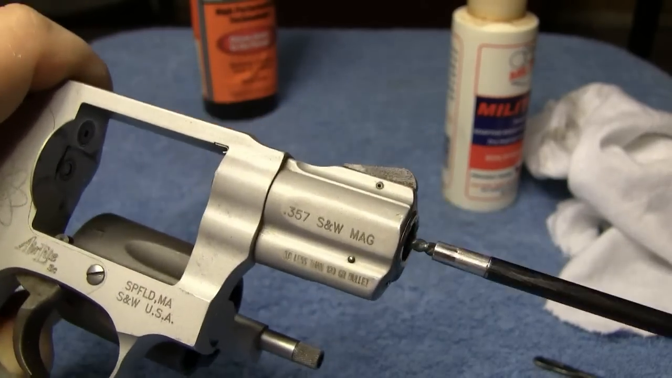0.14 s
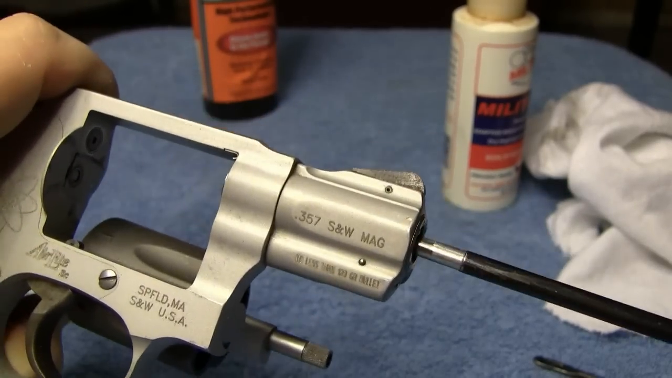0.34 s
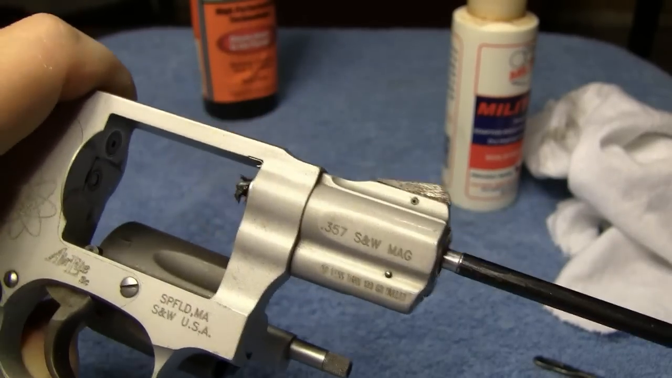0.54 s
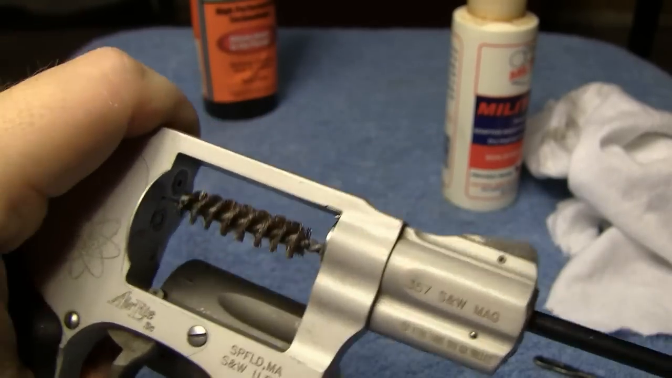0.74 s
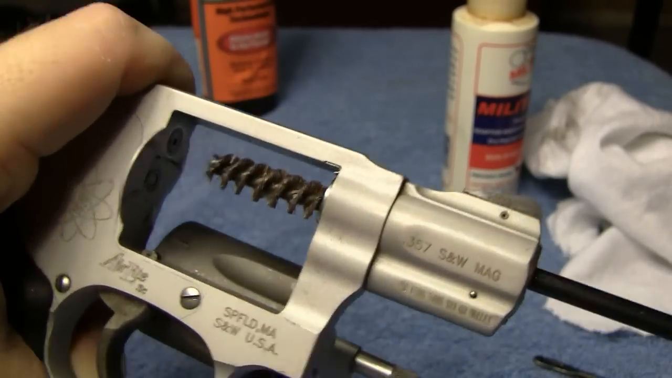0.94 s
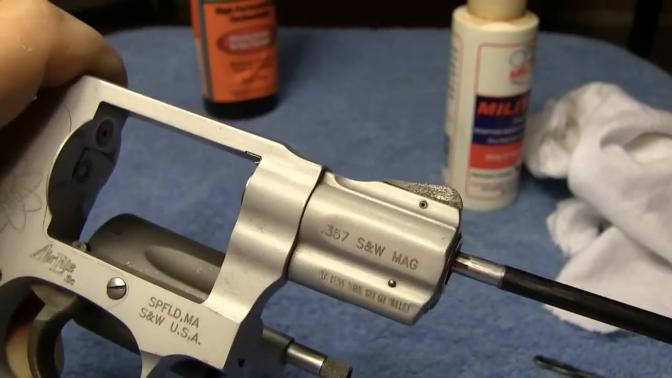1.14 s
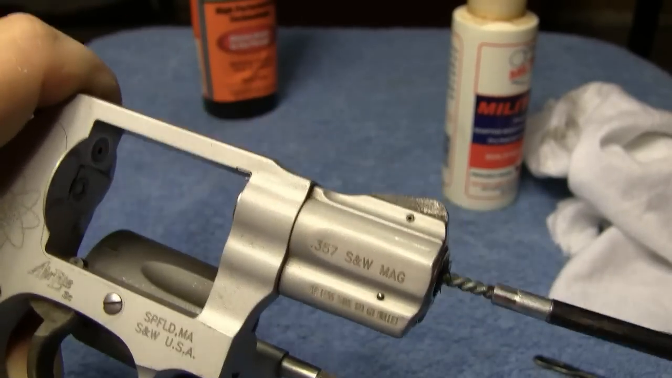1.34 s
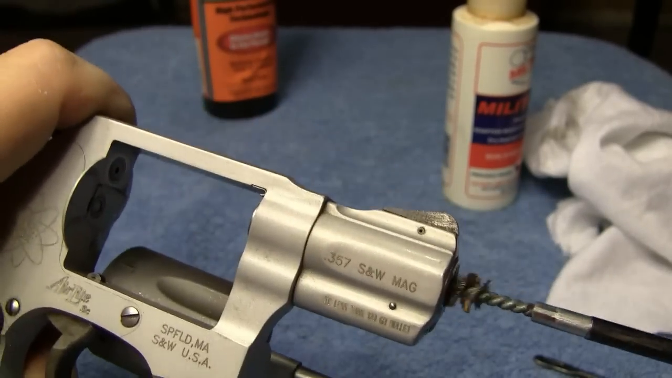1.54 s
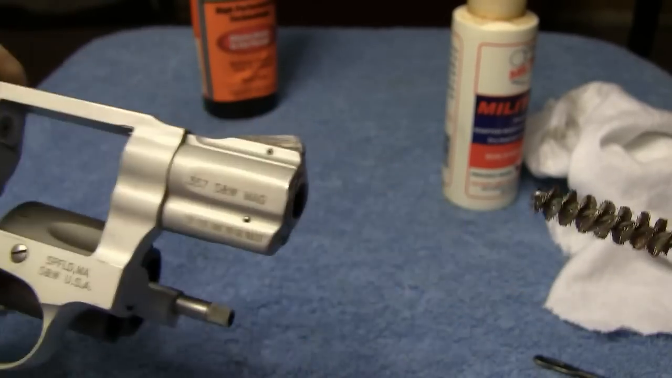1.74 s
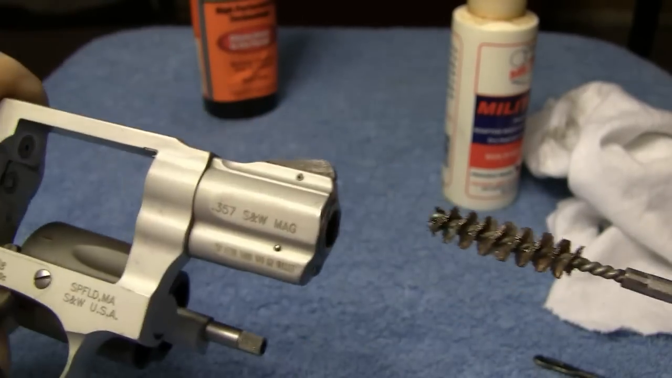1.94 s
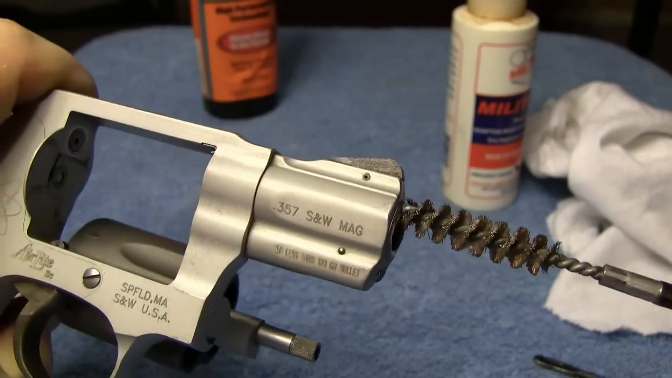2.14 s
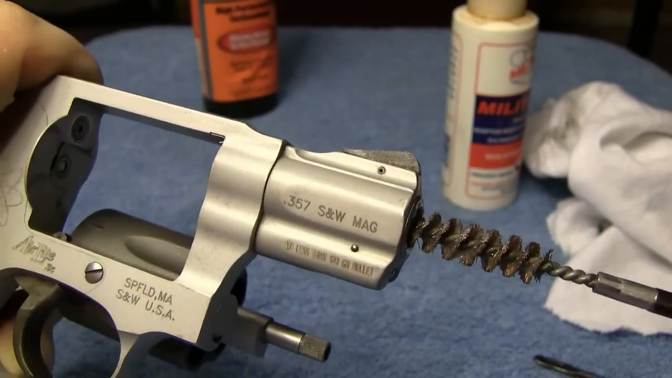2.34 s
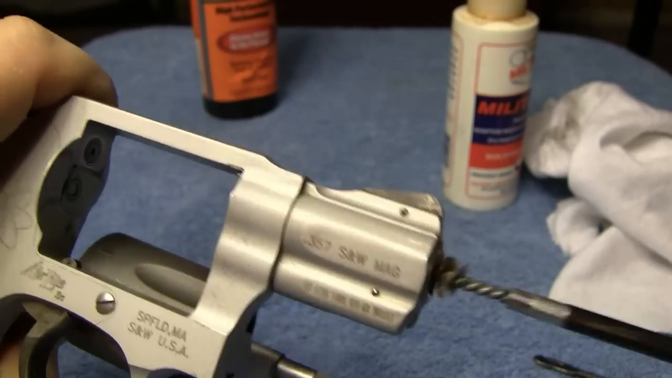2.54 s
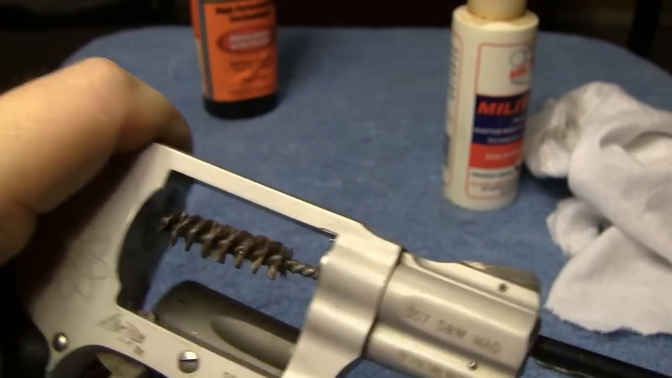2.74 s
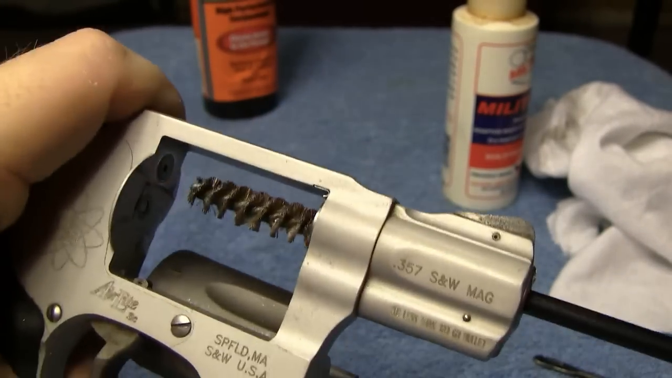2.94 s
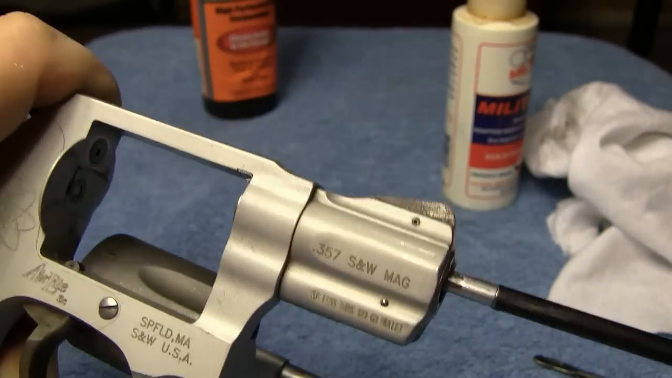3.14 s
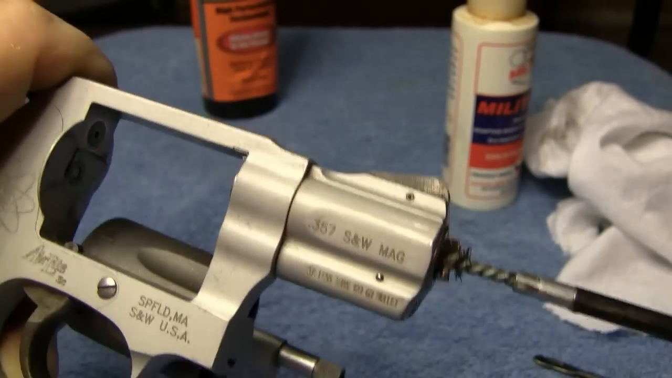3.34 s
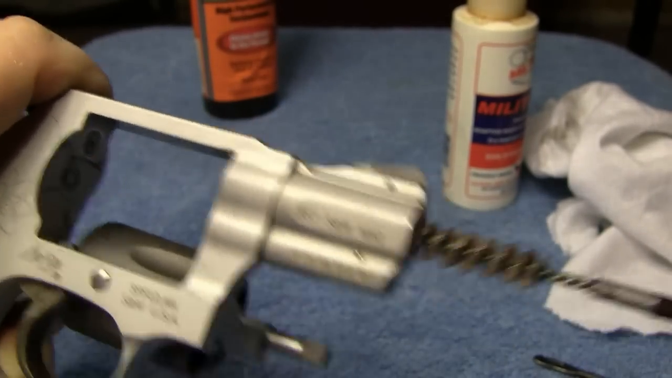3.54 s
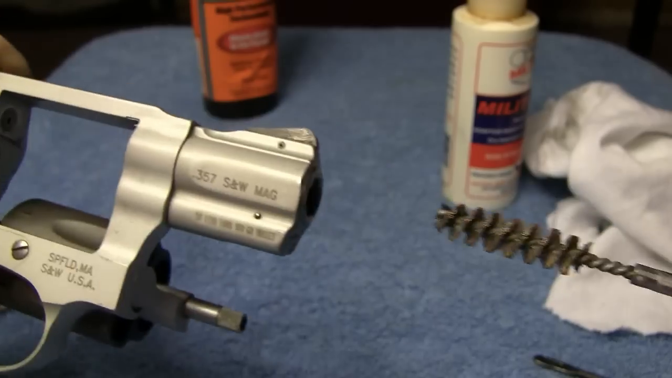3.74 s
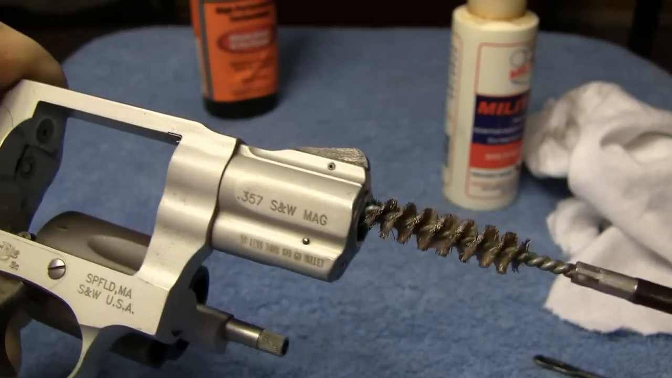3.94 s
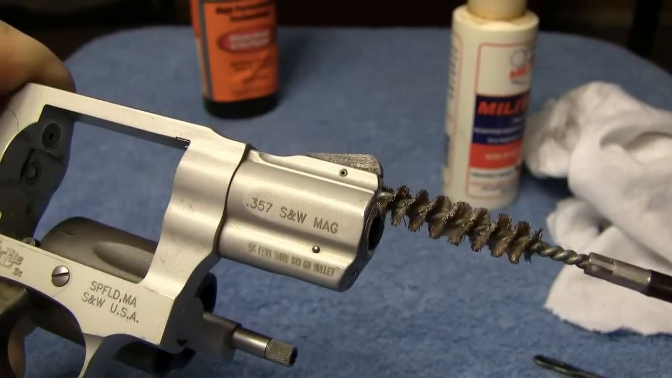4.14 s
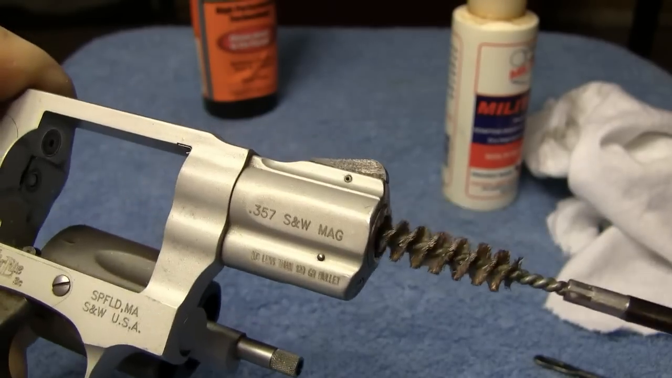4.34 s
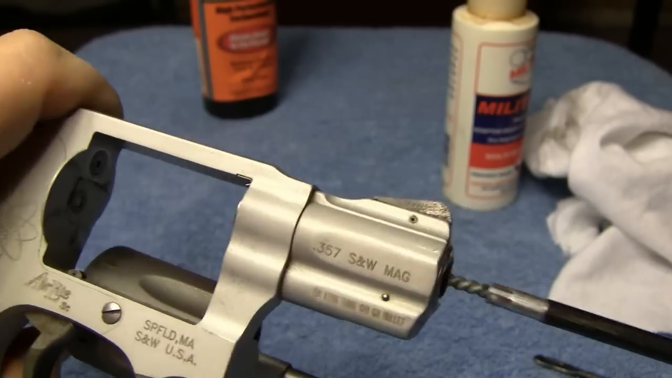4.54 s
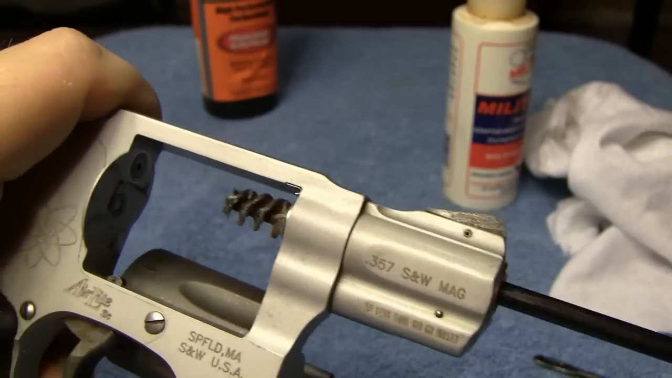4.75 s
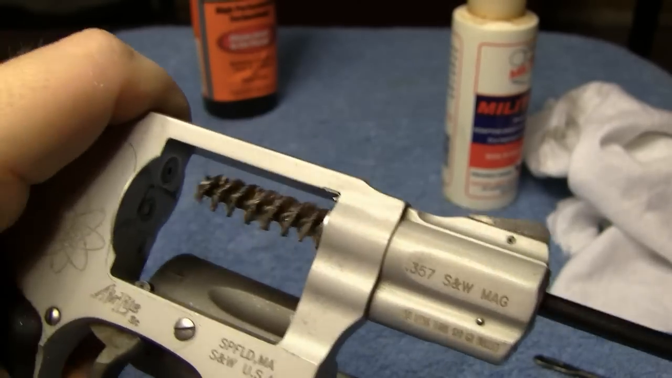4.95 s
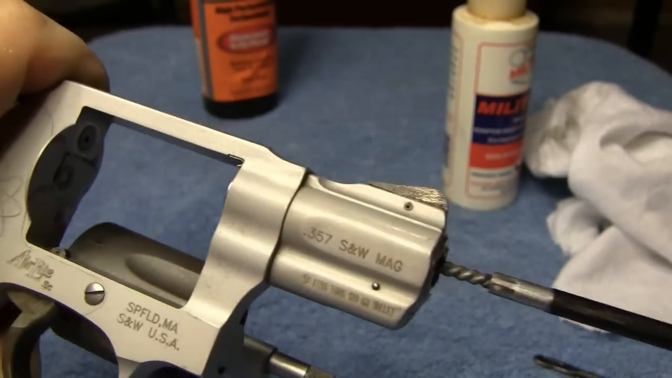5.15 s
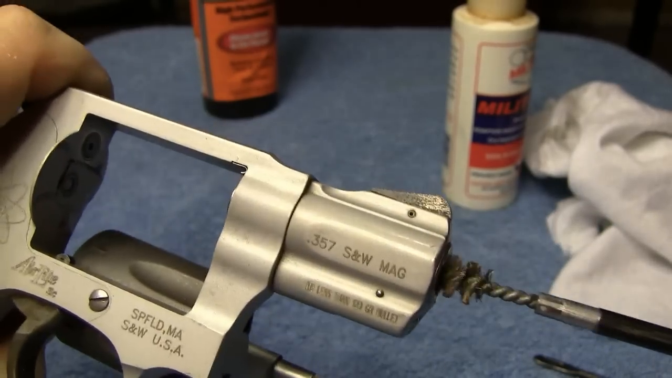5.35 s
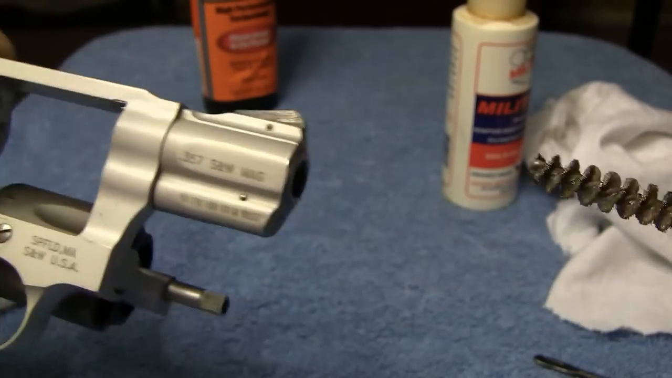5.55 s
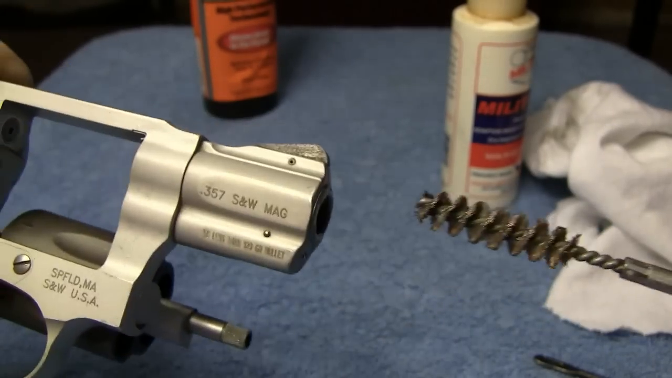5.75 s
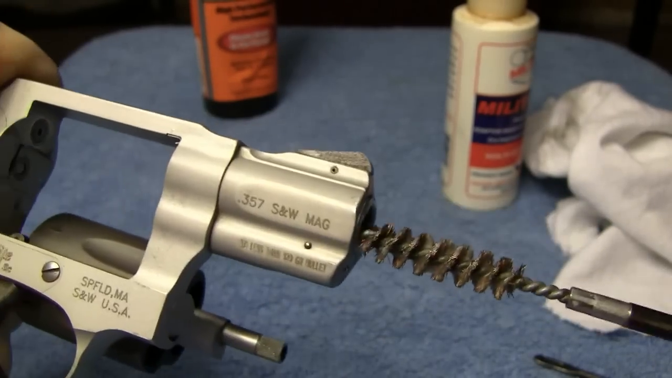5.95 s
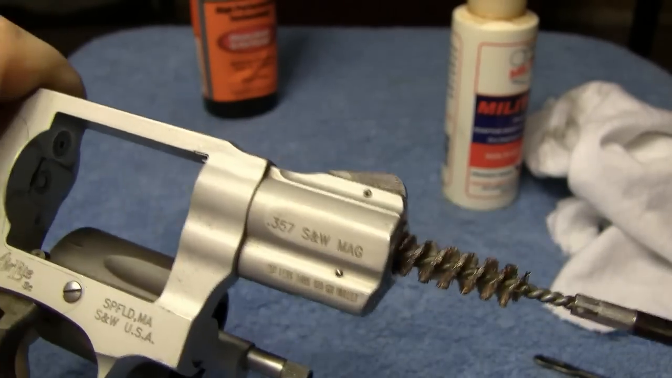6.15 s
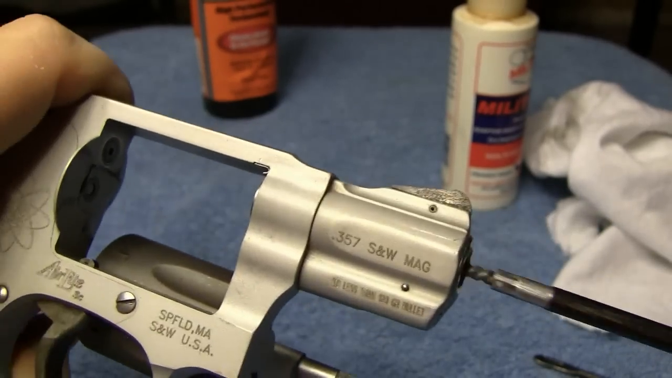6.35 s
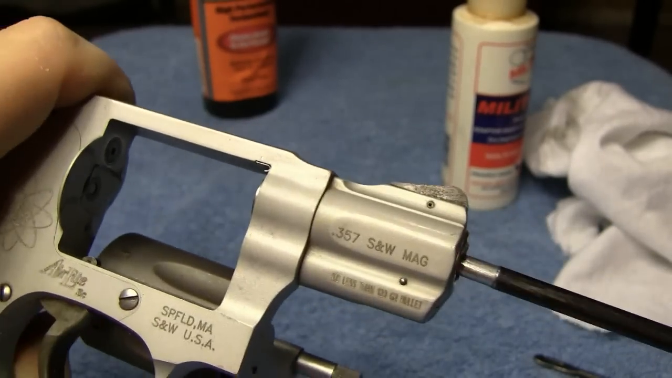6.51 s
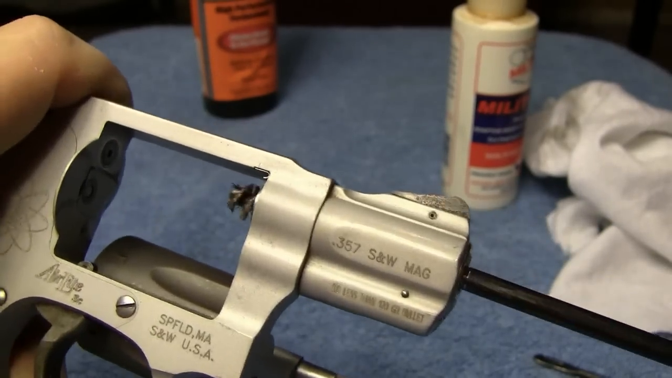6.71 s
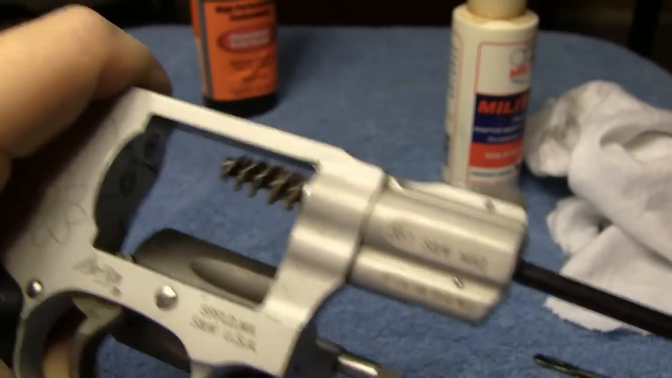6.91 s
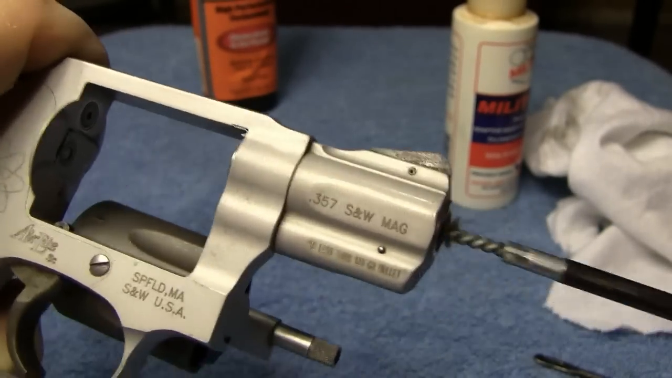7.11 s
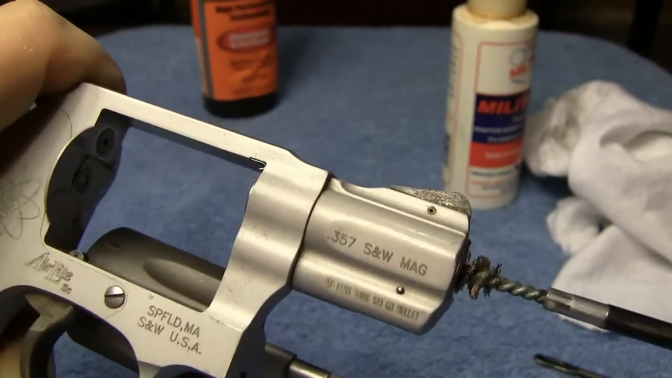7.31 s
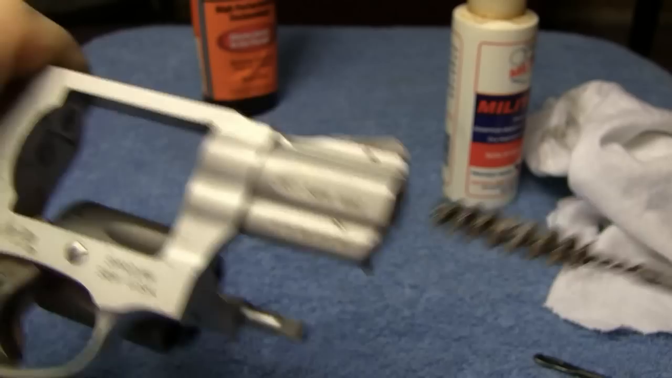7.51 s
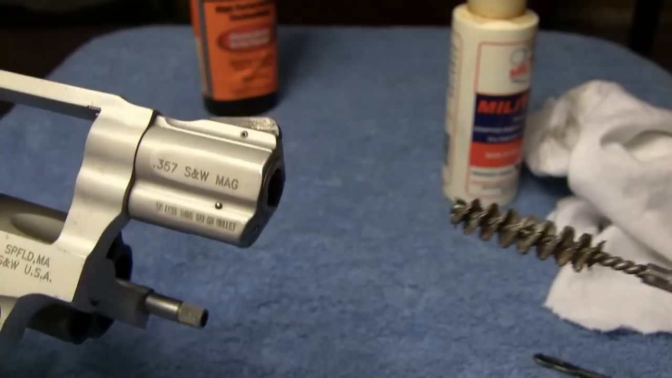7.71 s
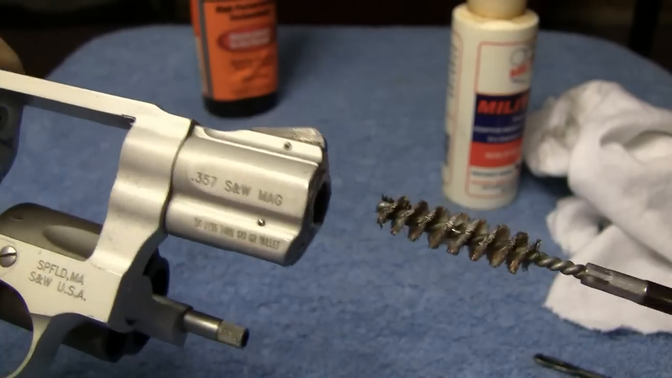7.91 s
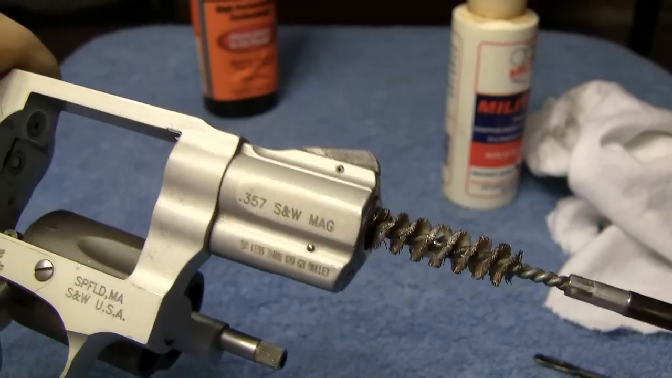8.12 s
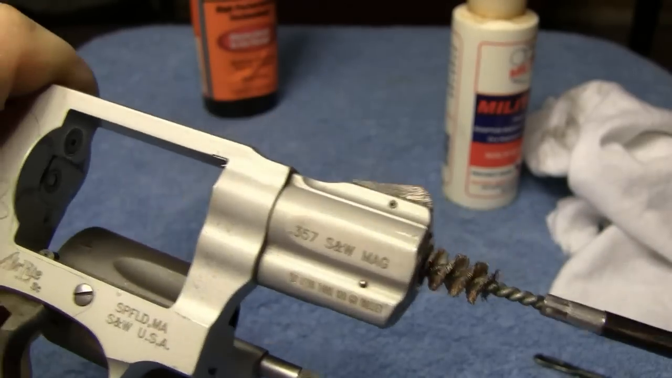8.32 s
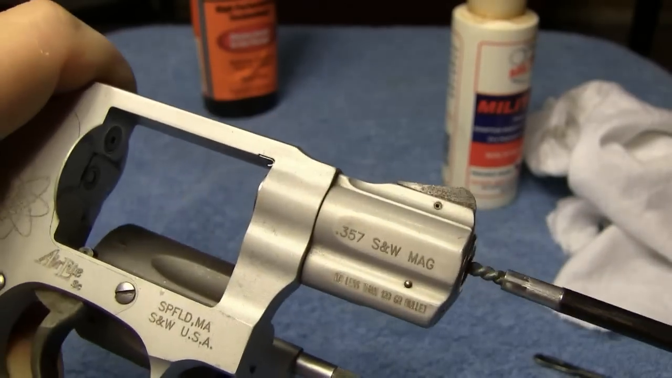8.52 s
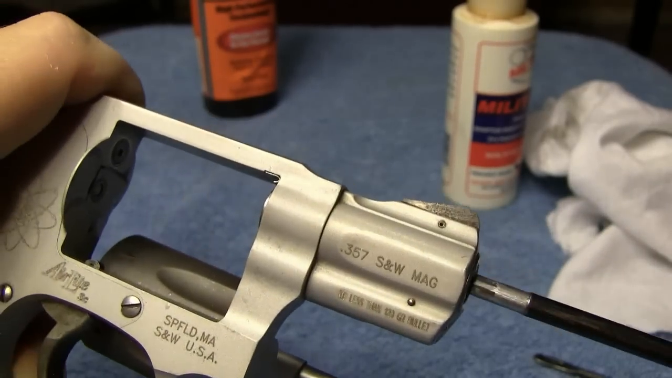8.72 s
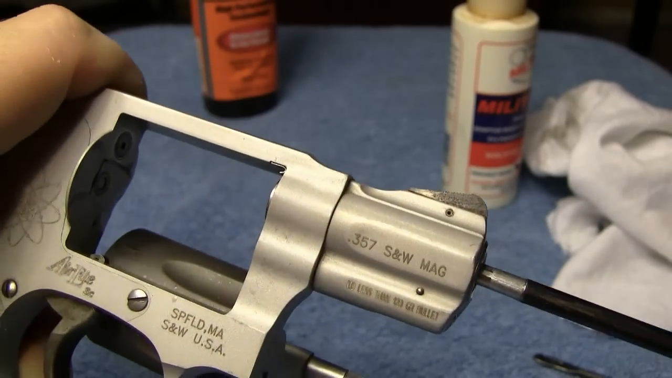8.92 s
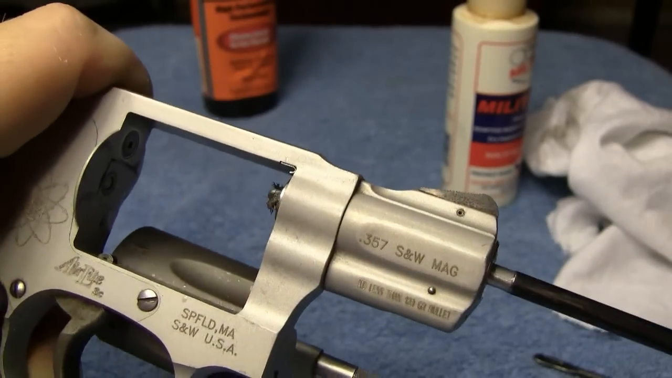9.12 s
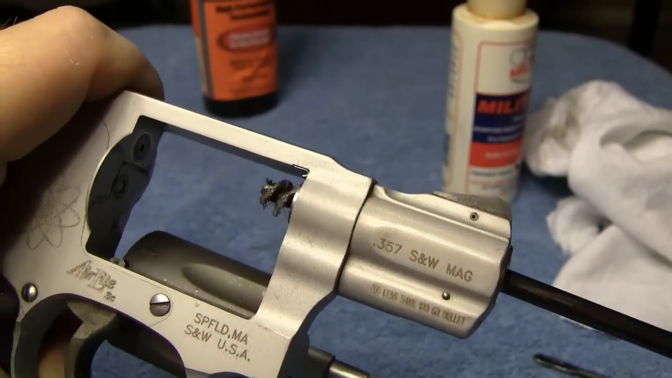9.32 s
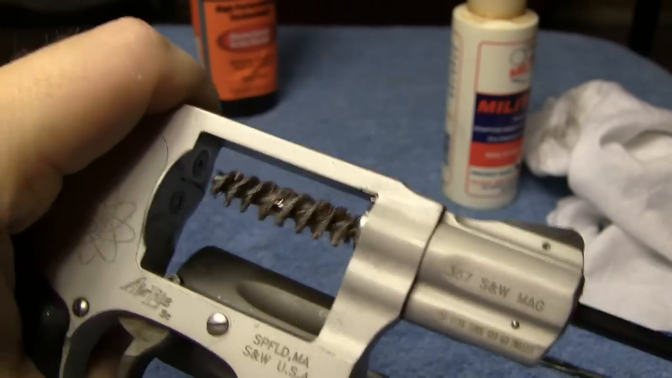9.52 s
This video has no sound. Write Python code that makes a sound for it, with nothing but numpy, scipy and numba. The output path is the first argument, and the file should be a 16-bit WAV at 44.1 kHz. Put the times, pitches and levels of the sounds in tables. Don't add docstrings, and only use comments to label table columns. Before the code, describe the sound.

Close, gritty bristle strokes scrape through a small metal tube, each cycle ending in a hollow upward pop as the brush leaves, over faint hum.

```python
import sys
import numpy as np
from scipy import signal
from scipy.fft import rfft, irfft, next_fast_len
from scipy.io import wavfile
from numba import njit

SR = 44100
rng = np.random.default_rng(int(sys.argv[2]) if len(sys.argv) > 2 else 0)


def pcm_store(signal):
    levels = np.round(np.clip(np.atleast_2d(signal), -1, 1) * 32767)
    wavfile.write(sys.argv[1], SR, levels.astype(np.int16).T)


def how_loud(loudness_db):
    steps = np.asarray(loudness_db, float) / 20
    return 10 ** steps


N = 426447


def rms_one(x):
    return x / np.sqrt(np.mean(x ** 2) + 1e-20)


def colour(x, points):
    hz, db = np.transpose(points)
    size = next_fast_len(N + 4096)
    log_hz = np.log(np.maximum(np.fft.rfftfreq(size, 1 / SR), 1))
    gain = how_loud(np.interp(log_hz, np.log(hz), db))
    return irfft(rfft(x, size) * gain, size)[..., :N]


def drift(rate_hz):
    r = np.exp(-2 * np.pi * rate_hz / SR)
    noise = rng.standard_normal(N + 9000)
    return rms_one(signal.lfilter([1], [1, -2 * r, r * r], noise)[9000:])


def band(x, low_hz, high_hz):
    return signal.sosfilt(signal.butter(3, [low_hz, high_hz], "band", fs=SR, output="sos"), x)


def mode(t, hz, db, t60_s):
    return how_loud(db - 60 * t / t60_s) * np.sin(2 * np.pi * hz * t)


@njit
def sliding(x, turn, r):
    y = np.zeros(len(x))
    for i in range(2, len(x)):
        drive = (1 - r[i] * r[i]) / 2 * (x[i] - x[i - 2])
        y[i] = drive + r[i] * turn[i] * y[i - 1] - r[i] * r[i] * y[i - 2]
    return y


def resonance(x, hz, width_hz):
    turn = 2 * np.cos(2 * np.pi * hz / SR) * np.ones(N)
    radius = np.exp(-np.pi * width_hz / SR) * np.ones(N)
    return sliding(x, turn, radius)


def air():
    # hz, level_db (per Hz)
    mid_colour = [(15, -61.5), (25, -28.5), (114, -7.5), (208, -6), (238, 0.5), (273, -5), (321, -5.5),
                  (809, -12.5), (927, -13), (1060, -13.5), (1640, -18.5), (15200, -42.5), (16500, -55.5)]
    side_colour = [(15, -50), (25, -23), (114, -19), (182, -2.5), (214, -3.5), (252, -0.5), (568, -1.5),
                   (3410, -25.5), (5720, -30), (6550, -33), (15200, -36.5), (16500, -62)]
    # hz, rms_db, width_hz
    mains = [(121, -77.5, 15), (248.6, -68, 13)]
    # time_s, level_db
    swell_points = [(0, 0), (2.5, -1.5), (5, 0.5), (7.5, 1), (8.5, -1), (9.67, 1.5)]
    mid = how_loud(-54) * rms_one(colour(rng.standard_normal(N), mid_colour))
    side = how_loud(-52) * rms_one(colour(rng.standard_normal(N), side_colour))
    buzz = rng.standard_normal((2, N))
    hum = np.zeros((2, N))
    for hz, rms_db, width_hz in mains:
        hum += how_loud(rms_db) * rms_one(np.array([resonance(row, hz, width_hz) for row in buzz]))
    swell_db = np.interp(np.arange(N) / SR, *np.transpose(swell_points))
    return (np.array([mid, side]) + hum * how_loud([[0], [-3.0]])) * how_loud(0.66 * drift(2.2) + swell_db)


def stroke_curves():
    # start_s, let_go_s, bite_hiss_db, let_go_hiss_db, extra_frame_db
    pushes = [(.075, .125, -53, -45.5, 1), (.15, .222, -41, -34, -0.5), (.283, .414, -40, -41.5, -0.5),
              (.578, .722, -35.5, -30.5, -0.5), (.705, .79, -28, -38.5, -3), (2.44, 2.524, -55, -42, 0),
              (2.555, 2.6, -43, -33, -1), (2.59, 2.746, -32, -25.5, -3.5), (2.74, 2.83, -20.5, -34, 2),
              (4.49, 4.575, -47.5, -33, -1), (4.565, 4.772, -32, -28, -1), (4.77, 4.96, -34, -38.5, -2),
              (6.235, 6.49, -37.5, -28, -1), (6.70, 6.85, -47, -27, 0.5), (6.85, 6.905, -28, -31.5, 3.5),
              (8.27, 8.388, -54, -33.5, 0), (8.37, 8.515, -33, -35, 1), (8.55, 8.61, -41.5, -45, 0.5),
              (8.61, 8.66, -43, -40.5, 2), (8.665, 8.74, -42, -42, 2), (8.78, 8.87, -49, -48.5, 1),
              (9.008, 9.1, -56.5, -37.5, 0.5), (9.35, 9.49, -47, -28.5, 2.5)]
    pulls = [(1.013, 1.045, -38.5, -38, -2), (1.048, 1.128, -27, -26, -3.5), (1.205, 1.35, -39.5, -31, -2),
             (3.09, 3.168, -30.5, -22.5, -2.5), (3.235, 3.4, -48.5, -25, -2),
             (5.005, 5.115, -44, -21.5, -2.5), (5.12, 5.232, -32.5, -29, -3),
             (5.22, 5.3, -29.5, -38.5, 0.5), (6.95, 7.055, -43, -29, -1.5), (7.083, 7.22, -27.5, -26, -2.5)]
    exits = [(1.5, 1.725, -46.5, -24.5, 0), (3.48, 3.645, -37.5, -24.5, 4.5), (5.385, 5.54, -36, -24.5, 2),
             (7.455, 7.592, -32.5, -23, 4.5), (9.46, 9.545, -31, -34, 7)]
    grazes = [(0, .04, -51.5, -46, 0), (.505, .57, -49.5, -57.5, -0.5), (2.175, 2.21, -55, -67.5, -6),
              (2.34, 2.46, -65, -55, -15), (2.86, 2.92, -54.5, -46, 3.5), (2.928, 3.008, -57.5, -52, 6),
              (4.068, 4.164, -61, -72, 1), (4.383, 4.432, -52.5, -50, -2), (4.43, 4.52, -48, -49, 0),
              (6.052, 6.09, -53.5, -69.5, 1), (6.14, 6.19, -51.5, -56, -8), (6.2, 6.24, -59.5, -54, 0),
              (3.05, 3.09, -70.5, -66.5, 0), (6.64, 6.72, -72, -52.5, -3),
              (7.29, 7.318, -60.5, -45.5, -0.5), (7.33, 7.41, -60.5, -60, -6),
              (8.14, 8.278, -62.5, -54, -7), (8.895, 8.96, -48, -50, 0.5), (9.215, 9.34, -47.5, -53.5, 1),
              (9.622, 9.66, -43.5, -56, 0.5)]
    # start_db, bite_s, ease_s, ease_db, stop_s, stop_db
    strokes = [(pushes, (-56, 0.0091, 0.005, 6, 0.0676, -66)),
               (pulls, (-59, 0.0323, 0.03, 10, 0.0439, -55.5)),
               (exits, (-59, 0.0529, 0.0072, 15.5, 0.0084, -58.5)),
               (grazes, (-67, 0.05, 0, 6, 0, -71))]
    t = np.arange(N) / SR
    power = 0.2
    rest_db = -95.0
    hiss_db, frame_db = np.full(N, rest_db), np.full(N, rest_db)
    for table, (start_db, bite_s, ease_s, ease_db, stop_s, stop_db) in strokes:
        for start, go, bite_db, go_db, extra_db in table:
            times = np.maximum.accumulate([start - .005, start, start + bite_s, go, go + ease_s,
                                           go + stop_s, go + stop_s + .01])
            eased_db = go_db - ease_db
            levels = np.array([rest_db, min(start_db, bite_db), bite_db, go_db, eased_db,
                               min(stop_db, eased_db), rest_db])
            on = slice(max(int(times[0] * SR), 0), int(times[-1] * SR))
            level_db = 20 * np.log10(np.interp(t[on], times, how_loud(power * levels))) / power
            shake_db = level_db - 7.5 + extra_db - 0.31 * (np.maximum(level_db, -60.0) + 33)
            hiss_db[on] = np.maximum(hiss_db[on], level_db)
            frame_db[on] = np.maximum(frame_db[on], shake_db)
    return hiss_db, frame_db - hiss_db


def slips(per_s, spread_db):
    per_s = np.clip(per_s, 30, .9 * SR)
    sizes = how_loud(spread_db * np.minimum(rng.exponential(1, N), 4)) * (rng.random(N) < per_s / SR)
    return rms_one(sizes / np.sqrt(per_s) * rng.standard_normal((2, N)))


def brush():
    # hz, level_db
    wire_colour = [(2940, -49), (5000, -23.5), (5960, -9), (9770, 3), (11900, 0), (13900, -9), (15500, -10),
                   (16300, -31), (16500, -69)]
    frame_colour = [(530, -33.5), (900, -12), (1360, -2.5), (1810, 7), (2210, 9.5), (3150, 10.5),
                    (4300, 10.5), (4840, 3.5), (5240, 7.5), (6000, -4.5), (7800, -26.5), (13200, -120)]
    # hz, wander_share, width_hz, level_db
    bends = [(8930, 0.18, 870, -3), (6120, 0.15, 480, -1)]
    frame_rings = [(2100, 0.15, 180, 0), (3970, 0.19, 130, -10.5)]
    hiss_db, frame_db = stroke_curves()
    per_s = 14000.0 * how_loud(0.9 * (hiss_db + 36.5) + 3.0 * drift(60)) + 140.0
    uneven_db = 2.5 * np.clip((-42.0 - hiss_db) / 20.0, 0, 1)
    ticks = slips(per_s, uneven_db) * how_loud(0.9 * drift(30))
    wire = rms_one(colour(ticks, wire_colour))
    for hz, wander, width_hz, level_db in bends:
        centre = hz * np.exp(wander * drift(5.0))
        wire = wire + how_loud(level_db) * np.array([resonance(row, centre, width_hz) for row in wire])
    frame = rms_one(colour(ticks * how_loud(2.0 * drift(28)), frame_colour))
    for hz, wander, width_hz, level_db in frame_rings:
        centre = hz * np.exp(wander * drift(2.95))
        frame = frame + how_loud(level_db) * np.array([resonance(row, centre, width_hz) for row in frame])
    return how_loud(hiss_db) * (wire + how_loud(frame_db) * frame)


def room(x):
    t = np.arange(SR // 2) / SR
    t60_s = 0.24
    tail = rng.standard_normal((2, len(t))) * np.clip(t / 0.0012, 0, 1) * how_loud(-60 * t / t60_s)
    tail = signal.lfilter([.5], [1, -.45], tail / np.sqrt(np.sum(tail[0] ** 2)))
    flutter = signal.lfilter(*signal.iirpeak(2700.0, 4.5, fs=SR), tail)
    tail = tail + how_loud(-10.0) * flutter
    return how_loud(-17) * signal.fftconvolve(tail, x[None], axes=1)[:, :N] * how_loud([[0], [-4.0]])


def bore(events):
    t = np.arange(N) / SR
    hz, push, per_s = np.full(N, 3000.0), np.zeros(N), np.full(N, 300.0)
    width_hz, over_db = np.full(N, 220.0), np.zeros(N)
    for start, end, from_hz, to_hz, level_db, rate, wide_hz, overtone_db, change_db in events:
        on = t >= start
        part = np.clip((t[on] - start) / (end - start), 0, 1)
        rising = to_hz > from_hz
        hz[on] = from_hz + (to_hz - from_hz) * part ** (2.8 if rising else 1.1)
        per_s[on], width_hz[on], over_db[on] = rate, wide_hz, overtone_db
        swell_db = change_db * (1 - part if rising else part)
        push[on] = how_loud(level_db - swell_db) * (part < 1)
    ticks = band(slips(per_s * how_loud(3.0 * drift(50)), spread_db=-1.0), 900.0, 10000.0) * push + 1e-18
    column = []
    for row in ticks:
        ground = resonance(row, hz, width_hz) * np.sqrt(220 / width_hz)
        overtone = resonance(row, 2 * hz - 150.0, 0.93 * width_hz)
        column.append(ground + how_loud(over_db) * overtone + how_loud(-27.5) * row)
    return how_loud(19.0) * np.array(column)


def plugged_bore():
    # start_s, end_s, from_hz, to_hz, level_db
    plugs = [(0.587, 0.697, 2160, 1900, -52), (2.503, 2.64, 1620, 1690, -50),
             (4.472, 4.56, 1850, 1750, -51), (4.565, 4.599, 1600, 1850, -45), (4.7, 4.79, 1950, 1900, -51),
             (4.901, 4.996, 1750, 1400, -47), (5.019, 5.062, 1500, 1450, -46.5),
             (5.095, 5.13, 1700, 1900, -44), (6.25, 6.356, 1910, 1650, -45.5),
             (8.328, 8.477, 1630, 2070, -47), (8.15, 8.21, 1930, 1850, -56.5),
             (9.057, 9.138, 1990, 2050, -51), (9.224, 9.4, 2140, 2040, -53),
             (9.455, 9.548, 1880, 2000, -41), (1.692, 1.74, 2350, 2300, -34),
             (3.6, 3.645, 2350, 2300, -39.5), (5.5, 5.55, 2350, 2300, -41), (7.51, 7.598, 2300, 2200, -41),
             (6.875, 6.922, 1900, 1750, -43), (6.953, 6.99, 1900, 2100, -46), (8.56, 8.74, 2050, 1950, -53),
             (8.8, 8.877, 2070, 2000, -56)]
    return bore(sorted((*row, 2500, 280, -12.5, 3.5) for row in plugs))


def pops():
    # start_s, end_s, level_db
    chirps = [
        (0.75, 0.773, -30.5),
        (1.7, 1.741, -26),
        (3.619, 3.65, -21),
        (5.515, 5.553, -23.5),
        (7.56, 7.601, -28.5),
    ]
    from_hz, to_hz, per_s = 2456, 3120, 2000
    ring = (220, -11.5, 10)     # width_hz, overtone_db, swell_db
    events = [(start, end, from_hz, to_hz, db, per_s, *ring) for start, end, db in chirps]
    for start, end, db in chirps[1:]:
        events.append((start - 0.068, start, .97 * from_hz, from_hz, db - 15, per_s, *ring))
        events.append((end, end + 0.077, 0.935 * to_hz, 2550, db - 17, per_s, 320, -14.5, 29))
    return events


def rims():
    # start_s, end_s, pitch_hz, level_db
    passes = [
        (0.787, 0.81, 3140, -35),
        (2.779, 2.836, 2800, -26.5),
        (2.966, 3.006, 3160, -44.5),
        (3.09, 3.134, 3200, -29.5),
        (4.899, 4.957, 2760, -37),
        (4.957, 4.995, 3050, -35.5),
        (5.018, 5.06, 2960, -31.5),
        (9.477, 9.552, 3060, -29.5),
    ]
    climb_hz = 190
    return [(start, end, hz, hz + climb_hz, db - 2.5, 3000, 500, -17.5, 6) for start, end, hz, db in passes]


def entries():
    # start_s, end_s, pitch_hz, level_db
    mouthfuls = [
        (2.342, 2.5, 3180, -55),
        (4.41, 4.508, 3050, -42),
        (6.142, 6.196, 3100, -46),
        (6.228, 6.27, 2950, -46),
        (6.878, 6.92, 3380, -28.5),
        (6.96, 7.03, 3210, -35.5),
        (8.149, 8.344, 3150, -48.5),
        (8.56, 8.74, 3700, -50),
        (9.051, 9.13, 3420, -51),
        (9.225, 9.354, 3480, -50.5),
    ]
    events = []
    for start, end, hz, db in mouthfuls:
        sag_hz = 1500 * (end - start)
        per_s = 2500 * how_loud(0.3 * (db + 40.5))
        events.append((start, end, hz, hz - sag_hz, db - 4.0, per_s, 210, -10, 2.5))
    return events


def open_bore():
    return bore(sorted(pops() + rims() + entries()))


def cracks():
    # time_s, peak_db, wire_over_peak_db, ring_hz, ring_time_factor
    hard_hits = [(2.844, -2, 2, 2160, .5), (2.9242, -2, -2.5, 3390, 0.53), (6.9962, -16, 8, 3300, .6),
                 (6.9987, 2.5, -2.5, 3150, 0.35), (9.6206, -13, -7.5, 3300, 0.66),
                 (2.8958, -33, 0, 2030, .8), (2.906, -33, -4, 1800, .8), (2.915, -35, 6, 2000, .6),
                 (9.571, -32, -3, 2090, .7), (9.645, -40, 8, 3000, .6), (.76, -16, -12, 2000, .8)]
    return [(s, db, -26, wire_db, hz, ring, 0, 1800) for s, db, wire_db, hz, ring in hard_hits]


def bumps():
    # time_s, peak_db, wire_over_peak_db, ring_hz, thud_over_peak_db
    body_hits = [(0.812, -9, -3.5, 2030, -9), (0.9304, -32, -13, 1820, -24), (1.414, -36, -8, 2250, -20),
                 (1.5457, -34, -13, 2200, -19), (2.1703, -8, -8, 2150, -8.5),
                 (2.247, -31.5, -19, 2100, -12), (2.3386, -38, -18, 3140, -18),
                 (2.849, -3, -5.5, 2000, 0.5), (4.0636, -11.5, -17, 2130, -5), (4.106, -35, -12, 1950, -8),
                 (4.152, -33, -22, 2630, -10), (4.278, -35, -13, 2370, -19), (5.3901, -34, -8, 2300, -19),
                 (6.0479, -16, -3, 3130, -1), (6.076, -42, -13, 3120, -16), (6.208, -37, -4, 2900, -13),
                 (6.6596, -32, -2, 2100, -17), (6.9123, -7, 0.5, 1900, -11), (6.9156, -10, -10.5, 1760, -5),
                 (7.426, -28.5, -3.5, 3780, -16), (8.155, -32, -17, 3070, -15),
                 (9.5463, -4.5, -5.5, 1800, -13)]
    return [(s, db, thud_db, wire_db, hz, 1, -1, 1500) for s, db, wire_db, hz, thud_db in body_hits]


def clicks():
    # time_s, peak_db, wire_over_peak_db, ring_hz
    rim_hits = [(0.8882, -20, -26, 2700), (1.0253, -21, 12, 3230), (1.05, -17, -1, 2870),
                (1.446, -28.5, 1, 4040), (2.8278, 1, -10, 2950), (3.0969, -6, -16, 2860),
                (4.3898, -28, -5, 3080), (4.8578, -20.5, -11, 2650), (5.4282, -21, -2, 2840),
                (6.143, -30, -7, 2990), (6.8737, -10.5, -12.5, 3280), (7.3168, -27, 2, 2330),
                (7.441, -27.5, -2, 2230), (7.4824, -24, -4, 2300), (9.1433, -31, -6, 2000),
                (9.21, -36.5, 7, 3300), (3.006, -24, -9, 3300), (3.018, -40, 0, 3276),
                (4.226, -41, -6, 2900), (6.622, -39, 5, 2900), (9.32, -42, 3, 3400),
                (2.8725, -23, -19.5, 3420)]
    return [(s, db, -26, wire_db, hz, .8, 0, 1800) for s, db, wire_db, hz in rim_hits]


def knocks():
    # hz, level_db, t60_s
    body_modes = [(287, -12, 0.013), (620, 1, 0.012), (950, 0, 0.011)]
    # hz, level_db, t60_s
    frame_modes = [(1700, -19, 0.003), (2100, -5.5, 0.014), (2900, -5.5, 0.013), (3400, -3, 0.0058),
                   (4370, -25, .005), (5000, -7, 0.0034)]
    # low_hz, high_hz, level_db, t60_s
    wire_bands = [(3870, 5600, -3, .009), (5500, 8000, 0, 0.014), (8000, 9600, 7, .015),
                  (9600, 11800, 3, 0.015), (11500, 22000, -7.5, 0.012)]
    out, t = np.zeros((2, N + 4000)), np.arange(4000) / SR
    for s, peak_db, thud_db, wire_db, hz, ring, frame_db, low_hz in cracks() + bumps() + clicks():
        chatter = rng.standard_normal((2, 200))
        modes = [(f, db + frame_db, t60_s) for f, db, t60_s in frame_modes] + [(hz, 2, .015)]
        sharp = np.zeros(len(t))
        for f, db, t60_s in modes:
            level_luck, pitch_luck = rng.standard_normal(2)
            sharp += mode(t, f * (1 + 0.027 * pitch_luck), db + 1.5 * level_luck, t60_s * ring)
        jingle = np.pad(chatter[1], (0, len(t) - 200))
        for low, high, db, t60_s in wire_bands:
            sharp += how_loud(db + wire_db + 7.5 - 60 * t / (t60_s * ring)) * band(jingle, low, high)
        dull = sum(mode(t, f, db + thud_db, t60_s) for f, db, t60_s in body_modes)
        crack = t == 0
        body = band(sharp + crack, low_hz, 18000.0) + band(dull, 220.0, 1700.0)
        push = signal.lfilter([1, -1], [1, -.85], chatter)
        push = push * [[0.26], [.5]] * how_loud(-60 * t[:200] / (0.006 * ring))
        push[0, 0] += 1
        hit = signal.fftconvolve(push, body[None], axes=1)[:, :4000]
        at = round(s * SR)
        out[:, at:at + 4000] += how_loud(peak_db - 4.0) * hit / np.abs(hit[0]).max() * [[1], [1.5]]
    return out[:, :N]


def flicks():
    # time_s, peak_db, pitch_hz flicks around knocks, pops and strokes, many of them strong
    scattered = [(.7978, -25, 3200), (2.8135, -17, 2960), (4.4065, -43, 3100), (5.022, -31, 2800),
                 (6.886, -20, 3500), (6.9932, -16.5, 3360), (7.0018, -19, 3250), (9.5372, -16, 3360),
                 (1.732, -18.5, 2950), (3.64, -19, 2950), (5.545, -22, 2950), (7.592, -20, 2750)]
    at_muzzle = [(1.5199, -41.5, 3790), (2.3534, -44, 3130), (2.3675, -42, 2990), (2.38, -42, 3060),
                 (2.4139, -44, 3060), (2.4224, -43, 2940), (2.4304, -37, 2960), (2.4523, -41, 2930),
                 (2.4708, -41, 2860), (2.5047, -34, 2710), (2.5514, -38.5, 3120), (2.607, -29.5, 1740),
                 (4.4224, -22.5, 3020), (4.4354, -29, 2950), (4.4662, -35, 2770), (4.5014, -38, 3060),
                 (6.1466, -33, 3050), (6.1604, -34, 2910), (6.1734, -34, 2870), (6.2287, -39, 2930),
                 (6.2334, -38, 3010), (6.2414, -36, 3180), (6.2594, -31, 2810), (6.2806, -31, 1840),
                 (7.4894, -26, 2330), (8.1774, -41, 3390), (8.1823, -38, 1880), (8.1914, -38, 3070),
                 (8.2132, -33, 3010), (8.2492, -39, 3080), (8.2721, -42, 2830), (8.2955, -34, 2950),
                 (8.3115, -32, 2980), (8.3174, -34, 2760), (8.3424, -33, 2970)]
    at_rim = [(2.7766, -19, 2910), (2.9642, -34, 3400), (2.9784, -32, 3380), (2.9921, -30, 3390),
              (3.1104, -16, 3460), (3.1294, -21, 3420), (4.9057, -24.5, 2910), (4.9254, -30, 3090),
              (4.9424, -32, 2880), (4.9731, -23, 3500), (4.985, -26.5, 3210), (5.036, -22, 2760),
              (5.0417, -21, 3450), (5.0524, -23, 3160), (5.0574, -23.5, 3260), (6.8428, -24.5, 2160),
              (7.0194, -26, 3440), (8.6872, -31, 3610), (8.7044, -33, 3570), (8.7374, -37, 3520),
              (8.7424, -41, 3160), (8.7504, -41, 2060), (8.7889, -41, 2220), (8.8024, -39, 2200),
              (8.8243, -34, 3450), (8.8374, -35, 3400), (8.8494, -35, 4280), (8.9456, -38, 3500),
              (9.2264, -36, 3630), (9.295, -33, 3390), (9.3094, -36, 3320), (9.3571, -38, 3470),
              (9.3691, -34, 3420), (9.4574, -25, 2920), (9.4784, -21, 3100)]
    # ring_t60_s, overtone_db, snap_db, snap_t60_s
    muzzle_ring, rim_ring = (0.03, -9.5, -1.5, 0.02), (0.0248, -15, -5, 0.04)
    out, t = np.zeros((2, N + 2000)), np.arange(2000) / SR
    kinds = [(scattered, rim_ring), (at_muzzle, muzzle_ring), (at_rim, rim_ring)]
    for table, (ring_s, over_db, snap_db, snap_s) in kinds:
        for s, peak_db, hz in table:
            overtone = mode(t, 2.02 * hz, over_db + 3.0 * rng.standard_normal(), .7 * ring_s)
            ring = (mode(t, hz, 0, ring_s) + overtone) * np.clip(t / .0005, 0, 1)
            grit = rng.standard_normal((2, 2000))
            snap = band(grit * how_loud(snap_db - 60 * t / snap_s), 1400.0, 13000.0)
            at = round(s * SR)
            out[:, at:at + 2000] += how_loud(peak_db - 2.0) * (ring * [[1], [.3]] + snap)
    return out[:, :N]


def scene():
    # hz, side_over_mid_db
    width_points = [(60, -6), (110, -12), (200, -6.5), (380, 0.5), (700, -12), (1290, -13), (2380, -38.5),
                    (4400, -11), (8120, -7), (15000, 0.5)]
    # hz, level_db
    lean_left = [(10000, -48), (12500, -18), (16000, -17)]
    lean_right = [(5000, -51), (8000, -24.5), (10500, -17.5), (12000, -48)]
    near, twin = brush() + plugged_bore() + open_bore() + knocks() + flicks()
    lag = np.gradient(near)
    wide = colour(0.63 * twin + .45 * lag, width_points)
    mid, side = np.array([near, wide]) + room(near) + air()
    side = side + colour(near, lean_left) - colour(near, lean_right)
    return np.array([mid + side, mid - side])


def top_cut(x):
    return signal.sosfilt(signal.butter(12, 16940, fs=SR, output="sos"), x)


def record(dry):
    cut = signal.sosfilt(signal.cheby2(10, 60, 16950, fs=SR, output="sos"), dry)
    return top_cut(np.clip(cut, -1, 1))


dry = scene()
out = record(dry)
pcm_store(out)
```